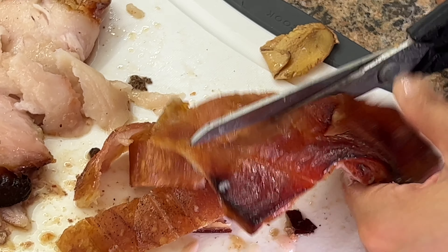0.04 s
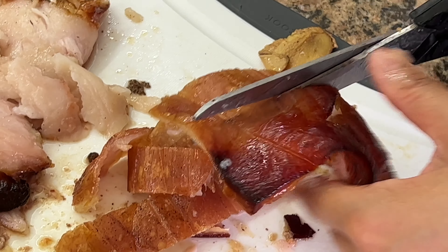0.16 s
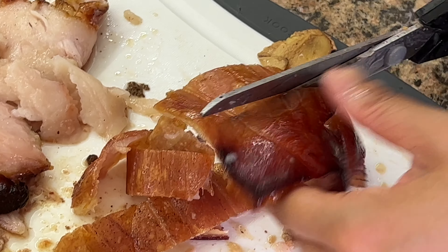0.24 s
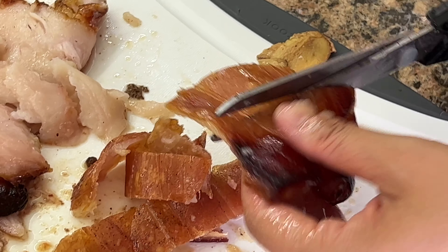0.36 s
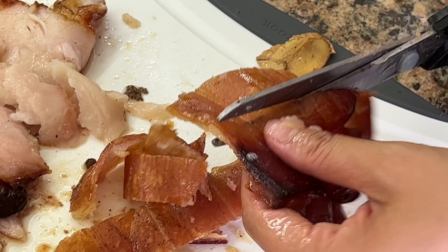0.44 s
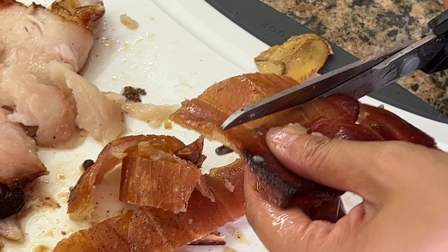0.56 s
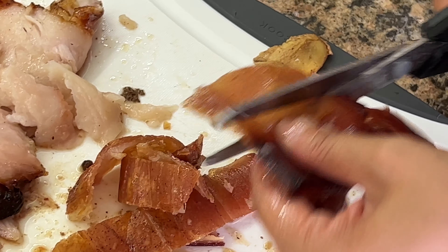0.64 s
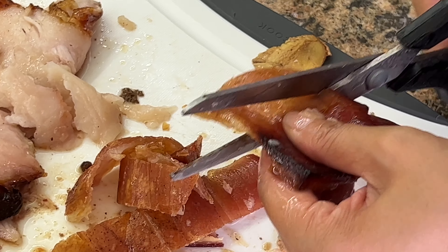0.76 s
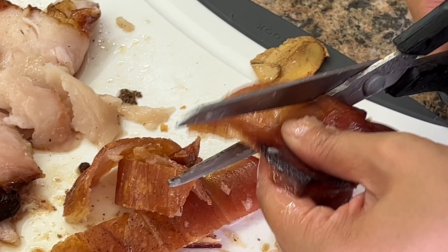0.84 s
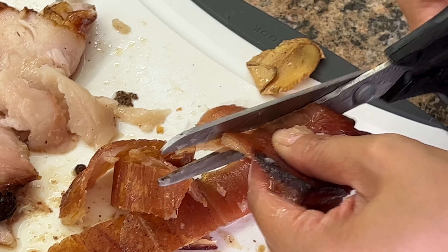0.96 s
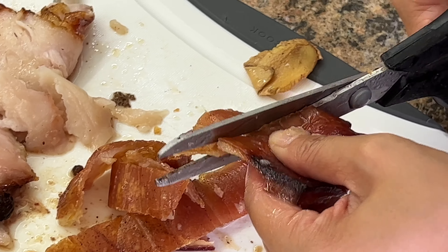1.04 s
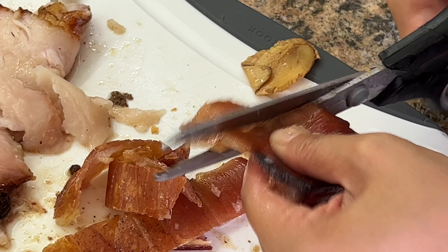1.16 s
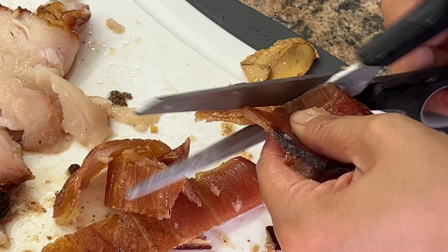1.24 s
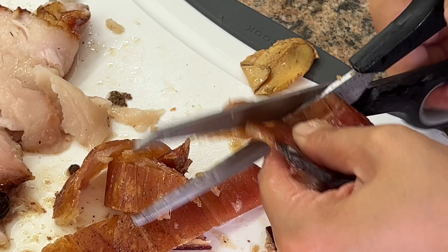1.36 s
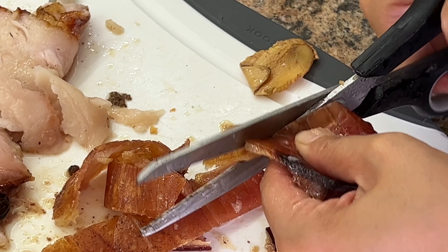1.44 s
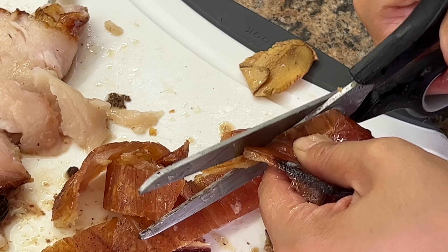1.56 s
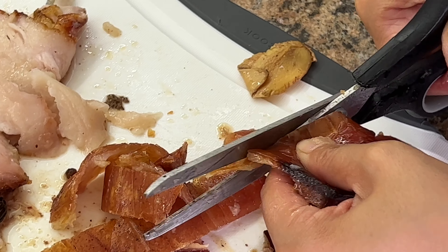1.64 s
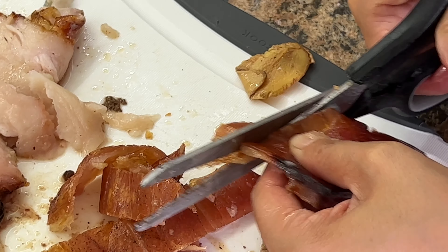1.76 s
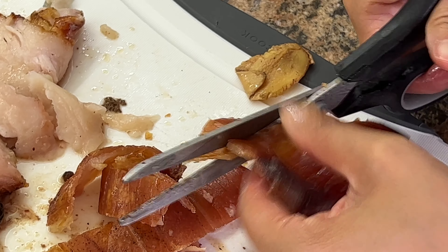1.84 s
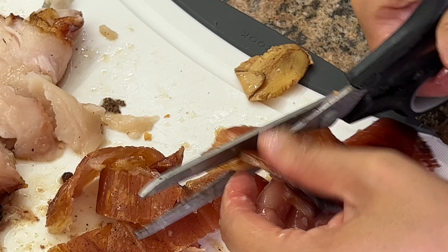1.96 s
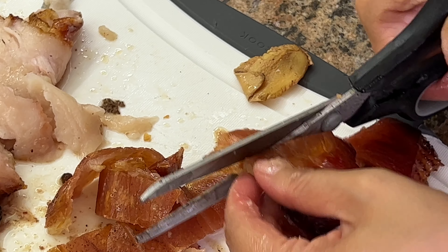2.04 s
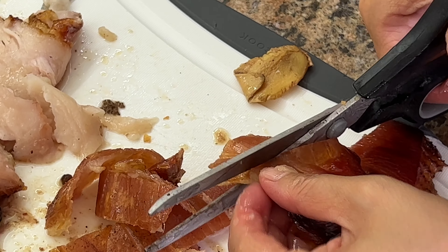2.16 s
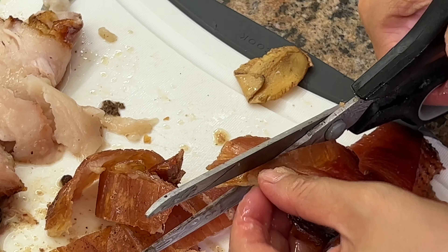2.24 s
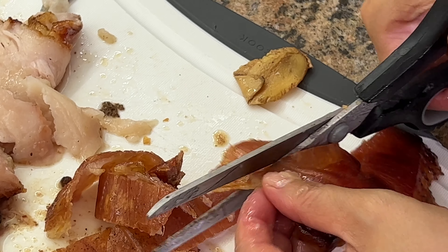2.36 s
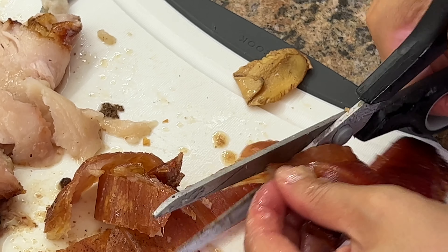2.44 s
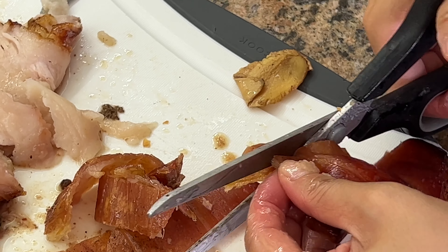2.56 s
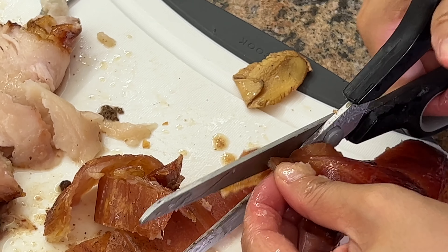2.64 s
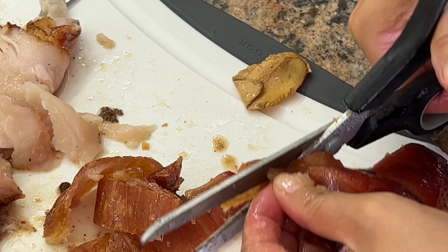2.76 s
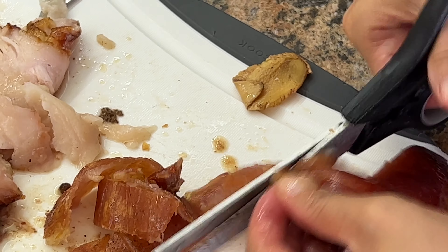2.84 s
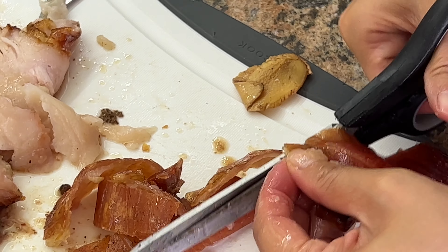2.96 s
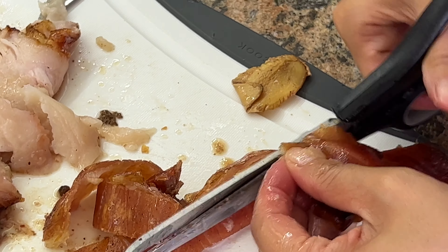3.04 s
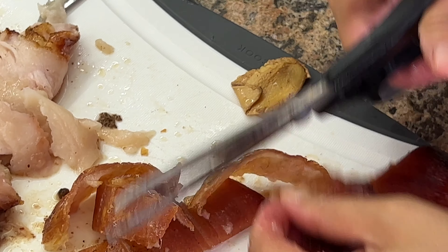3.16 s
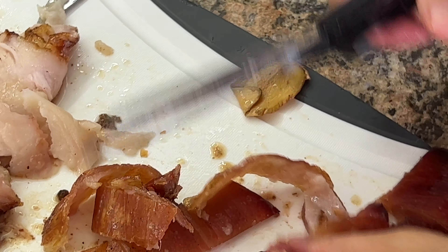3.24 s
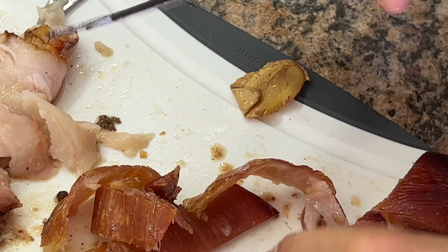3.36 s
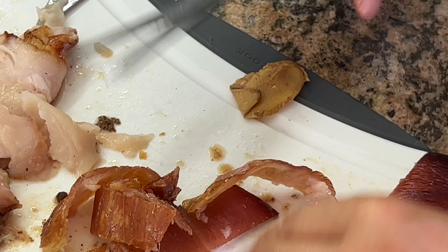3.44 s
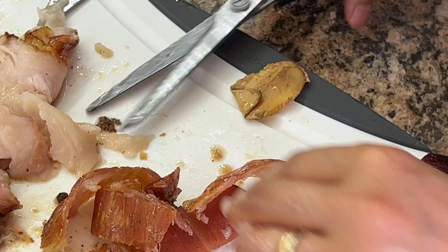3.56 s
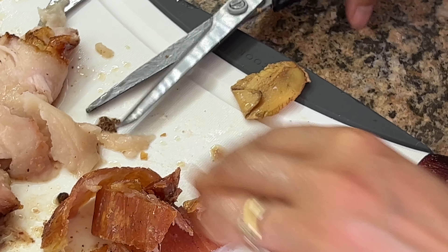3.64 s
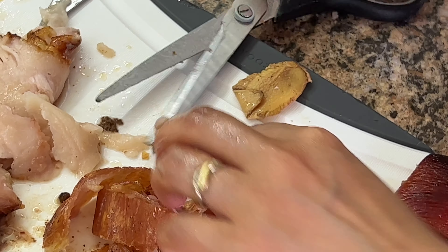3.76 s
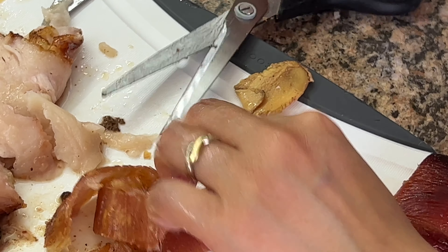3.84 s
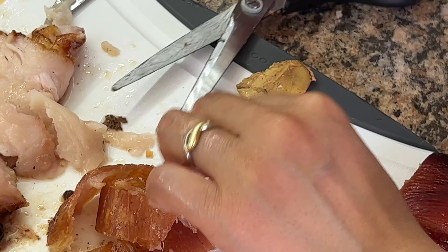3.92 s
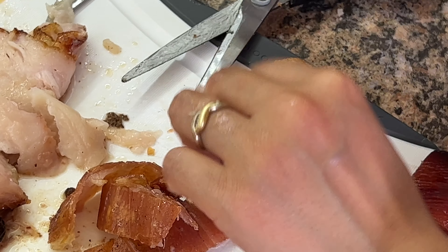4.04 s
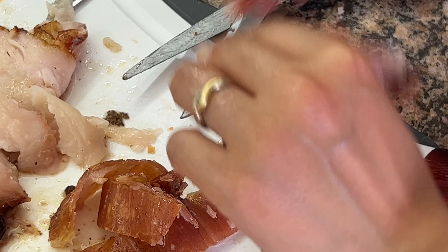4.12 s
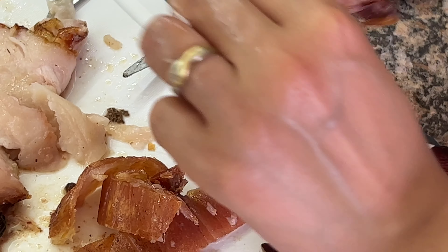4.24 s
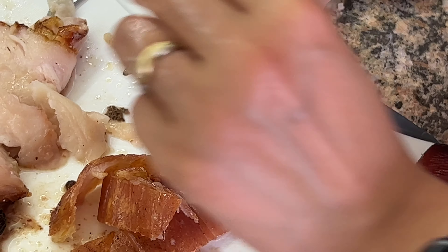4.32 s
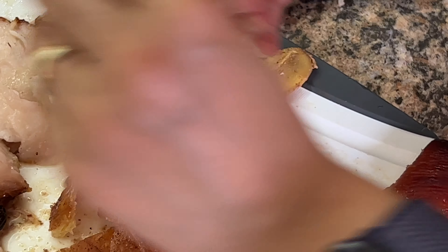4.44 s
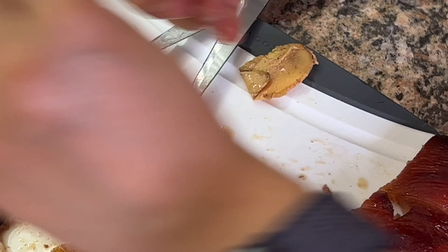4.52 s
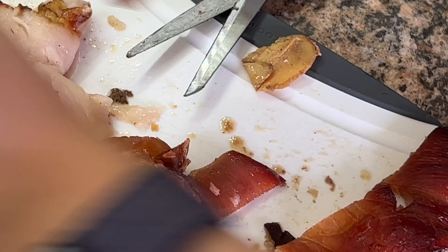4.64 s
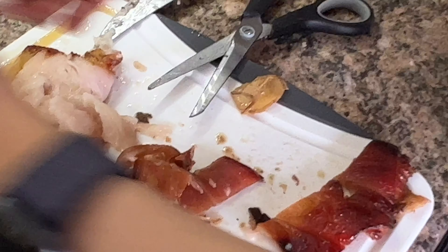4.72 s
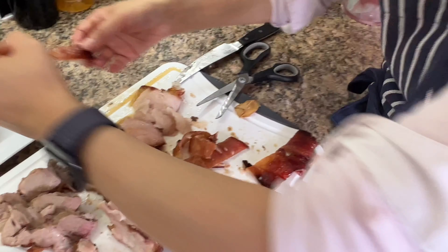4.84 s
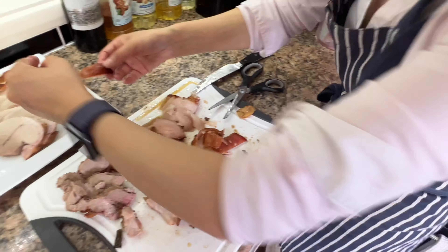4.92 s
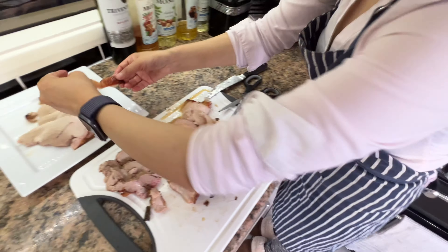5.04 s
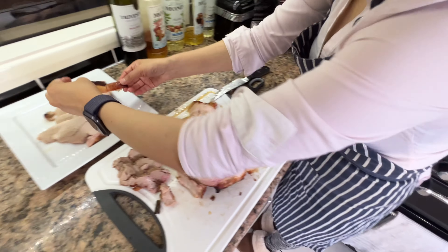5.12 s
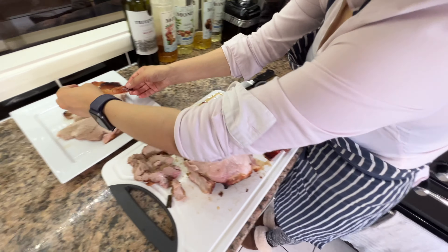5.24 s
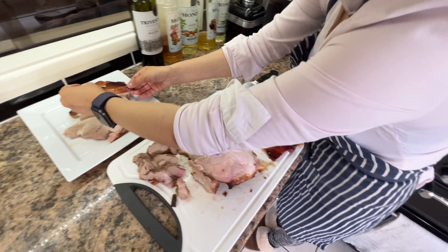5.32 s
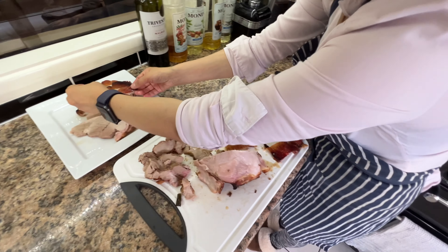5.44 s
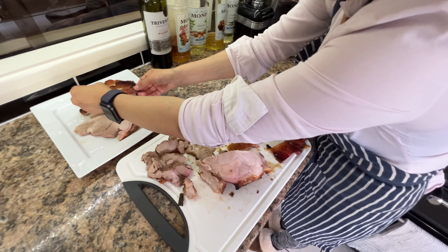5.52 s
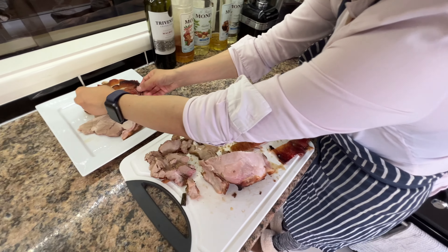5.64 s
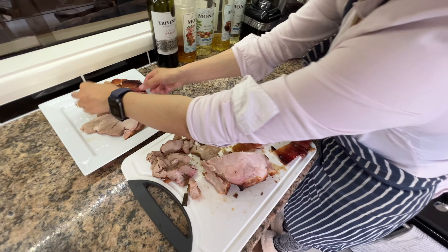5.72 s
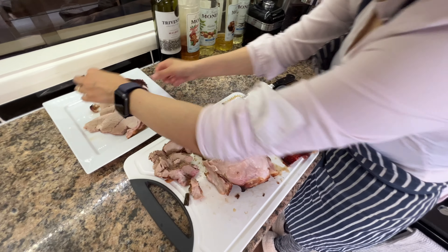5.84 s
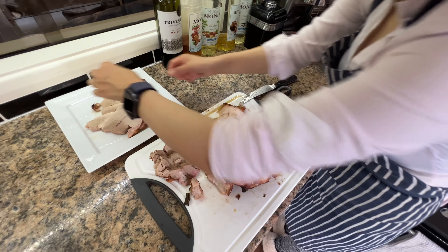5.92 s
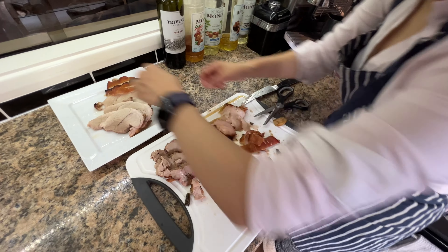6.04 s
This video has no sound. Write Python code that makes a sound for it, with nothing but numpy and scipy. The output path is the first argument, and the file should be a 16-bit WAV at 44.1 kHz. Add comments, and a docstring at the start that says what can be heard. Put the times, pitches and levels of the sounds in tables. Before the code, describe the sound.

Kitchen scissors snip crisp roast pork skin with sharp crunches and faint greasy rubbing, then clatter onto a plastic cutting board.

```python
"""Scissors cutting crisp pork skin

Kitchen scissors cut roast skin over a plastic board, close to a phone. Each fracture is a noise
burst that rings the blades, amid greasy rubbing and soft squelches. The scissors clatter onto the
board and pieces go on a plate. Near the end the hiss rises and the stereo image widens.
An appliance hums in the small, hard room."""
import sys
import numpy as np
from scipy import signal
from scipy.fft import rfft, irfft
from scipy.io import wavfile
from scipy.ndimage import uniform_filter1d

SR = 44100
rng = np.random.default_rng(int(sys.argv[2]) if len(sys.argv) > 2 else 0)


def file_out(sig):
    """Save sig as 16-bit WAV at sys.argv[1]."""
    # one column per channel
    cols = np.atleast_2d(sig).T
    # limit, then scale
    lim = np.clip(cols, -1, 1)
    pcm = np.round(lim * 32767).astype(np.int16)
    wavfile.write(sys.argv[1], SR, pcm)


N = 268105
BURST_N = 8192
BURST_HZ, BURST_S = np.fft.rfftfreq(BURST_N, 1 / SR), np.arange(BURST_N) / SR
SCENE_HZ, SCENE_S = np.fft.rfftfreq(N, 1 / SR), np.arange(N) / SR

# room noise spectrum: f/Hz, level/dB
AIR_SPECTRUM = [(18, -43.5), (32, -20.5), (45, -2), (66, -1), (160, -8), (277, -11), (500, -16.5),
                (950, -20.5), (2000, -43.5), (5000, -44), (16000, -61)]
# hiss spectrum: f/Hz, level/dB
HISS_SPECTRUM = [(200, -7.5), (600, 10.5), (1500, 2.5), (4000, -9), (8000, -7), (11000, -14.5),
                 (16000, -21)]
# appliance hum bands: f/Hz, level/dB, Gaussian width/Hz
HUM_BANDS = [(56, -60.5, 6.6), (109.73, -62, 2.9), (264, -66.5, 30), (463, -74, 8.7)]

# blades and fingers sliding on skin: t/s, length/s, level/dB
SLIDES = [(0, 0.19, -74.5), (0.595, 0.056, -66.5), (1.146, 0.057, -60), (2.373, 0.18, -68),
          (2.625, .17, -70.5), (3.281, 0.036, -64.5), (4.04, 0.25, -76), (4.348, 0.17, -69.5),
          (4.558, 0.28, -68), (5.85, 0.078, -73)]
# rubbing spectrum: f/Hz, level/dB
RUB_SPECTRUM = [(300, -19), (1000, 3.5), (2200, 7.5), (4000, 3.5), (5800, -0.5), (8000, -9.5), (16000, -16)]
# soft narrow-band chirps and squelches: t/s, level/dB, decay/ms, f/Hz, half-width/oct
SQUELCHES = [(0.037, -35.5, 10, 5560, 0.29), (0.136, -39, 35, 3600, .35), (0.402, -37.5, 13, 3130, 0.21),
             (0.61, -26.5, 3.1, 1940, 1), (0.622, -26.5, 11, 1680, .3), (0.689, -44.5, 31, 2900, 0.099),
             (1.625, -42, 25, 4940, 0.1), (1.739, -38, 18, 7200, 0.27), (1.993, -36, 28, 5200, 0.43),
             (2.285, -38, 30, 5180, 0.22), (3.174, -38.5, 12, 5460, 0.3), (3.195, -38, 38, 2917, .2),
             (4.16, -39, 35, 2910, 0.12), (4.738, -34, 17, 2220, 0.26), (5.053, -35.5, 5.3, 5740, 0.3),
             (5.282, -34.5, 6, 3330, 0.18), (5.494, -45, 4.2, 6000, 0.22), (5.652, -37, 25, 1625, .15),
             (5.961, -38.5, 3.7, 5000, .4), (5.992, -35.5, 9, 5900, 0.32)]

# skin fracture spectrum: f/Hz, level/dB
SKIN_SPECTRUM = [(100, -27.5), (600, -19.5), (1000, -17.5), (1400, -7.5), (2050, -3.5), (2700, -8.5),
                 (4500, -4), (7600, 4), (9200, -2.5), (10500, -5.5), (12300, -3.5), (14000, -7),
                 (15800, -12.5)]
# free ring of the blades: f/Hz, level/dB, T60/s
STEEL_MODES = [(2060, -3, .13), (5577, -8, .17), (6100, -5, .2), (6455, 2, .3), (7270, 4, .2),
               (8100, -2, .15)]
# single cracks: t/s, level/dB, decay/ms, body/dB, fizz/dB, blade/dB
CRACKS = [(0.0857, -33.5, 1.6, -21, 0.5, -19), (0.8327, -22.5, 0.4, -1, 4, 3),
          (0.8498, -12.5, 0.99, -4.5, 3.5, -4), (0.869, -11.5, 1.2, 0.5, 2, 1),
          (0.888, -7, 0.72, 4.5, 4, 6), (1.2148, -25, 1, 12, 6, 6), (1.3314, -24.5, 0.7, 1, 3, -2),
          (1.3968, -21.5, 8.2, 1, 2.5, -5), (1.811, -34.5, 4.4, 22, 5, 9), (2.431, -31.5, 3, 25.5, -21, 6),
          (2.53, -32, 1.7, 16, -16, 3), (2.6626, -16, 0.62, -2, -6, 12.5)]
# severing snaps: first crack t/s, level/dB; break t/s, level/dB; decay/ms, body/dB, fizz/dB, blade/dB
SNAPS = [(0.944, -2.5, 0.9471, 2.5, 1.9, 4, 1, -3.5), (2.8062, 2, 2.8116, 8.5, 0.95, -6.5, 1.5, 4.5)]
# crumbs of crust giving way: t/s, level/dB, body/dB
CRUMBS = [(0.626, -30, 16), (0.639, -29.5, 19.5), (0.650, -32.5, 13), (1.45, -32, -10), (2.0345, -47, 1.5),
          (2.056, -37.5, 5), (2.1019, -35, 2), (2.1707, -43.5, 8), (2.444, -30, 28), (2.787, -29, -2.5)]

# board response: f/Hz, level/dB
BOARD_SPECTRUM = [(32, -58), (58, -12), (80, 1.5), (98, -3.5), (120, 5), (140, -7), (162, 2), (230, -11),
                  (340, -4.5), (600, -5.5), (2000, -9.5)]
# soft bumps, a hand then both handles: t/s, level/dB, decay/ms, cutoff/Hz
BUMPS = [(1.220, -7, 8.2, 237.6), (3.853, -5, 12, 599), (3.862, 0, 15, 240)]
# bare contact spectrum: f/Hz, level/dB
CONTACT_SPECTRUM = [(80, -3), (250, -11.5), (1400, 4), (4400, 2.5), (9000, -10), (11000, -10),
                    (16000, -19.5)]
# ring of scissors lying on the board: f/Hz, level/dB, T60/s
CLATTER_MODES = [(320.5, -4, 0.19), (864, -4.5, .11), (1100, -8, 0.22), (1630, -5.5, 0.2), (2140, -4, 0.1),
                 (2530, -5, 0.15), (3560, -9, 0.12), (5320, -0.5, 0.077)]
# scissor and board resonances, by landing part: f/Hz, width/Hz, level/dB
TIPS = [(1133, 300, 18.5), (1810, 360, 14.5), (2922, 180, 15.5), (3250, 180, 12.5), (4100, 110, 10.5),
        (5300, 520, 8.5), (8640, 620, 4.5)]
PIVOT = [(374, 74, 17), (905, 150, 15.7), (1800, 250, 15.2), (2120, 120, 16), (2470, 84, 15),
         (3550, 580, 11.6), (5770, 630, 9.9), (8000, 2000, 3)]
HANDLES = [(400, 43, 8.2), (1040, 150, 12.3), (1700, 140, 8.9), (2150, 140, 14.3), (2580, 450, 10.2),
           (5450, 120, 9.9), (6060, 540, 9.2), (7360, 1800, 4)]
# hard knocks on the board: t/s, part, level/dB, decay/ms, treble/dB, ring/dB, push/dB
LANDINGS = [(3.5190, TIPS, 0.5, 1.15, 3, -20, -9.5), (3.5512, TIPS, -6, 1.7, 0.5, -18, -14),
            (3.6794, HANDLES, -25, 2.5, 13, -13, -10.5), (3.7457, PIVOT, 3, 3.6, 0.5, -13, -13),
            (3.8256, HANDLES, 2.5, 4.2, 2, -13.5, -10.5), (3.8670, HANDLES, -4, 12, -12.5, -10.5, -16),
            (3.911, HANDLES, -20.5, 4.5, -16, -18, -16)]
# smacks of pieces pressed on the plate: t/s, level/dB, f/Hz, half-width/oct
PLACINGS = [(5.221, -32, 3900, 0.51), (5.729, -27.5, 3340, 0.27)]

# room decay: f/Hz, T60/s
ROOM_T60_S = [(100, 0.34), (500, 0.46), (2000, 0.38), (6500, 0.35), (10000, 0.2), (16000, 0.25)]
# diffuse sound at the two microphone ports: f/Hz, coherence
COHERENCE = [(50, 0.92), (150, 1), (350, 0.48), (700, .4), (3000, 1)]
# port imbalance: f/Hz, left minus right/dB
BALANCE_DB = [(30, 1.5), (150, 2.5), (300, 0.3), (1200, 2.5), (2500, 0.54)]
# side signal of close reflections: f/Hz, level/dB
NEAR_SIDE_DB = [(100, -16.5), (600, -6), (1300, -7), (2400, -16), (8000, -19)]
# side signal of the widened image: f/Hz, level re mid/dB
WIDE_SIDE_DB = [(100, -32), (300, -3.5), (600, 1), (8000, -1), (13000, -2)]


def amp(db):
    """Decibels to gain."""
    return 10 ** (np.asarray(db) / 20)


def unit_energy(x):
    """Scale to energy 1."""
    return x / np.sqrt(np.sum(x ** 2) + 1e-20)


def unit_rms(x):
    """Scale to rms 1."""
    return x / np.sqrt(np.mean(x ** 2) + 1e-20)


def lookup(table, hz):
    """Interpolate over log frequency."""
    table_hz, value = np.transpose(table)
    return np.interp(np.log(hz + 1), np.log(table_hz + 1), value)


def add(mix, start_s, sound):
    """Mix in at start_s."""
    part = mix[max(round(start_s * SR), 0):][:len(sound)]
    part += sound[:len(part)]


def shaped(x, spectrum):
    """Filter a scene-length signal by a dB table."""
    return irfft(rfft(x) * amp(lookup(spectrum, SCENE_HZ)), N)


def diffuse(length):
    """Stereo noise, partly coherent as at two nearby ports."""
    coherence = np.clip(lookup(COHERENCE, np.fft.rfftfreq(length, 1 / SR)), 0, 1)
    noise = rfft(rng.standard_normal((2, length)))
    mid, side = noise * np.sqrt([(1 + coherence) / 2, (1 - coherence) / 2])
    return irfft(np.array([mid + side, mid - side]), length)


def fade(tau_ms):
    """Exponential decay."""
    return np.exp(-BURST_S * 1000 / max(tau_ms, 0.05))


def burst(envelope, colour_db, smooth_bins):
    """Enveloped noise, flattened, then coloured at minimum phase."""
    spectrum = rfft(rng.standard_normal(BURST_N) * envelope)
    magnitude = np.sqrt(uniform_filter1d(abs(spectrum) ** 2, smooth_bins) + 1e-12)
    log_gain = np.log(amp(np.maximum(colour_db, -80)) / magnitude)
    mirrored = np.r_[log_gain, log_gain[-2:0:-1]]
    log_causal = np.conj(signal.hilbert(mirrored))[:len(BURST_HZ)]
    return unit_energy(irfft(spectrum * np.exp(log_causal), BURST_N))


def ring(modes, spot_db=1.5):
    """Decaying modes; levels vary with the spot struck."""
    t = np.arange(SR // 2) / SR
    sound = np.zeros(len(t))
    for hz, db, t60_s in modes:
        gain = amp(db + spot_db * rng.standard_normal())
        sound += gain * amp(-60 * t / t60_s) * np.sin(2 * np.pi * (hz * t + rng.random()))
    return unit_energy(sound)


def room_air(db=-58):
    """Low, diffuse room noise."""
    return amp(db) * unit_rms(shaped(diffuse(N), AIR_SPECTRUM))


def hiss(early_db=-89.5, late_db=-69.5, rise_at_s=4.42, ramp_s=0.32):
    """Fine hiss; rises near the end."""
    rise = np.clip((SCENE_S - rise_at_s) / ramp_s, 0, 1)
    return unit_rms(shaped(diffuse(N), HISS_SPECTRUM)) * amp(early_db + (late_db - early_db) * rise)


def appliance_hum():
    """Wavering hum from narrow noise bands."""
    out = np.zeros(N)
    for hz, db, width_hz in HUM_BANDS:
        band = np.exp(-0.5 * ((SCENE_HZ - hz) / width_hz) ** 2)
        out += amp(db) * unit_rms(irfft(rfft(rng.standard_normal(N)) * band, N))
    return out


def slide_envelope(attack_s=0.023, release_s=0.02, holding_db=-80):
    """Slides rise, hold and die; between them the fingers only shift their hold."""
    power = amp(holding_db) ** 2
    for start_s, length_s, db in SLIDES:
        age_s = SCENE_S - start_s
        stroke = np.clip(age_s / attack_s, 0, 1) * np.exp(-np.maximum(age_s - length_s, 0) / release_s)
        power = power + (amp(db) * stroke) ** 2
    return np.sqrt(power)


def rubbing(grains_per_s=450, spread_db=1.0, smooth_gain=0.77, pocket_db=2.0):
    """Crust crumbles over a greasy slide; wet pockets add brief, shifting resonances."""
    sizes = amp(spread_db * np.minimum(rng.exponential(1, N), 4))
    grains = unit_rms(sizes * rng.standard_normal(N) * (rng.random(N) < grains_per_s / SR))
    frames = signal.stft(grains + smooth_gain * rng.standard_normal(N), nperseg=256)[2]
    patch = np.outer(np.hanning(11), np.hanning(35))  # bins by frames
    pockets = unit_rms(signal.fftconvolve(rng.standard_normal(frames.shape), patch, "same"))
    slide = signal.istft(frames * amp(pocket_db * np.minimum(pockets, 2)), nperseg=256)[1][:N]
    return unit_rms(shaped(slide, RUB_SPECTRUM)) * slide_envelope()


def squish(decay_ms, hz, half_width_oct, rise_ratio=0.29, flutter_db=5):
    """Brief, uneven scuff of noise in one band."""
    band_db = -10 * np.log10(1 + (np.log2((BURST_HZ + 1) / hz) / half_width_oct) ** 8)
    flutter = amp(flutter_db * unit_rms(uniform_filter1d(rng.standard_normal(BURST_N), size=130)))
    return burst(flutter * fade(decay_ms) * (1 - fade(rise_ratio * decay_ms)), band_db, smooth_bins=40)


def squelches(faint_count=48, faint_per_s=8, faint_db=-45.5, faint_hz=3400, range_oct=0.85):
    """Short, soft narrow-band chirps and squelches: some clear, others faint and random."""
    out = np.zeros(N)
    for start_s, db, *shape in SQUELCHES:
        add(out, start_s, amp(db) * squish(*shape))
    for k, (jitter, pitch) in enumerate(rng.random((faint_count, 2))):
        hz = faint_hz * 2 ** (range_oct * (2 * pitch - 1))
        faint = squish(decay_ms=28, hz=hz, half_width_oct=0.16)
        add(out, (k + jitter) / faint_per_s, amp(faint_db) * faint)
    return out


def fracture(db, decay_ms, body_db, fizz_db, blade_db, scatter_db=-20, scatter_ms=10, rise_ms=0.38):
    """Tight burst, scattered by hand and board; jolts the blades into ringing."""
    body = lookup([(3000, 1.0), (6000, 0.018)], BURST_HZ)  # thick pieces
    fizz = lookup([(8000, 0.018), (11500, 1.0)], BURST_HZ)  # thin flakes
    blade_hz, half_width_hz = 6320, 430  # strongest resonance, damped by the grip
    blade = 1 / (1 + ((BURST_HZ - blade_hz) / half_width_hz) ** 2)
    colour_db = lookup(SKIN_SPECTRUM, BURST_HZ) + body_db * body + fizz_db * fizz + blade_db * blade
    envelope = (fade(decay_ms) + amp(scatter_db) * fade(scatter_ms)) * (1 - fade(rise_ms))
    sound = amp(-25 + 0.8 * blade_db) * ring(STEEL_MODES)
    add(sound, 0, burst(envelope, colour_db, smooth_bins=200))
    return amp(db) * sound


def cutting(splinters=2, gap_s=0.0029, step_db=-8.5, splinter_body_db=4):
    """Single cracks and two snaps; a snap is first crack, break, dying splinters."""
    out = np.zeros(N)
    for start_s, *crack in CRACKS:
        add(out, start_s, fracture(*crack))
    for first_s, first_db, break_s, db, decay_ms, body_db, fizz_db, blade_db in SNAPS:
        # blades still grip: less fizz, more steel
        add(out, first_s, fracture(first_db, decay_ms, body_db, fizz_db - 3.5, blade_db + 6.5))
        add(out, break_s, fracture(db, decay_ms, body_db, fizz_db, blade_db))
        for k in range(1, splinters + 1):
            splinter = fracture(db + k * step_db, decay_ms, splinter_body_db, fizz_db, blade_db)
            add(out, break_s + k * gap_s, splinter)
    return out


def crackle():
    """Crumbs of crust give way under blade pressure."""
    out = np.zeros(N)
    for start_s, db, body_db in CRUMBS:
        add(out, start_s, fracture(db, decay_ms=6.5, body_db=body_db, fizz_db=-5, blade_db=4))
    return out


def reopening(open_s=1.215, ring_hz=5394, ring_db=-74, t60_s=0.65, scrape_s=1.39, scrape_db=-31.5):
    """Blades spring apart, one rings freely, then the edges scrape together."""
    out, t = np.zeros(N), np.arange(SR // 2) / SR
    add(out, open_s, amp(ring_db - 60 * t / t60_s) * np.sin(2 * np.pi * ring_hz * t))
    add(out, scrape_s, amp(scrape_db) * squish(decay_ms=100, hz=7800, half_width_oct=0.21))
    return out


def board_push(decay_ms, cutoff_hz):
    """A soft push excites only the board's low resonances."""
    softness_db = -10 * np.log10(1 + (BURST_HZ / cutoff_hz) ** 6)
    return burst(fade(decay_ms), lookup(BOARD_SPECTRUM, BURST_HZ) + softness_db, smooth_bins=7)


def thuds(lag_s=0.00508, db_per_oct=31, contacts=3, rebound_s=0.02, rebound_db=-7):
    """The board gives after each knock, and under soft bumps that rebound."""
    out = np.zeros(N)
    for start_s, _, db, *_, push_db in LANDINGS:
        cutoff_hz = 385 * 2 ** (db / db_per_oct)  # harder knocks reach higher
        add(out, start_s + lag_s, amp(push_db) * board_push(decay_ms=20, cutoff_hz=cutoff_hz))
    for start_s, db, decay_ms, cutoff_hz in BUMPS:
        for k in range(contacts):
            add(out, start_s + k * rebound_s, amp(db + k * rebound_db) * board_push(decay_ms, cutoff_hz))
    return out


def knocks(scatter_db=-18, scatter_ms=10, rise_ms=0.56):
    """Tips, pivot and handles hit the board, each with its own short resonances."""
    out = np.zeros(N)
    treble = lookup([(3500, 0), (7000, 1)], BURST_HZ)
    for start_s, part, db, decay_ms, treble_db, ring_db, _ in LANDINGS:
        power = amp(lookup(CONTACT_SPECTRUM, BURST_HZ)) ** 2
        for hz, width_hz, mode_db in part:
            power += (amp(mode_db) / (1 + 2 * ((BURST_HZ - hz) / width_hz) ** 2)) ** 2
        colour_db = 10 * np.log10(power) + treble_db * treble
        contact = (fade(decay_ms) + amp(scatter_db) * fade(scatter_ms)) * (1 - fade(rise_ms))
        add(out, start_s, amp(db) * burst(contact, colour_db, smooth_bins=40))
        add(out, start_s, amp(db + ring_db) * ring(CLATTER_MODES))
    return out


def plate(drop_s=4.851, flop_lag_s=0.027, squash_lag_s=0.012):
    """Meat drops with a click and a thump, flops to rest; pressed pieces smack, then squash."""
    out = np.zeros(N)
    add(out, drop_s, amp(-35) * squish(decay_ms=2, hz=1350, half_width_oct=1.3))
    add(out, drop_s, amp(-12) * squish(decay_ms=3.8, hz=360, half_width_oct=0.74))
    add(out, drop_s + flop_lag_s, amp(-20) * squish(decay_ms=6.5, hz=360, half_width_oct=0.74))
    for start_s, db, hz, half_width_oct in PLACINGS:
        smack = squish(decay_ms=4.7, hz=hz, half_width_oct=half_width_oct)
        squash = squish(decay_ms=9.8, hz=1320, half_width_oct=0.3)
        add(out, start_s, amp(db) * smack)
        add(out, start_s + squash_lag_s, amp(db - 3.5) * squash)
    return out


def kitchen_reverb(x, build_ms=9):
    """Dense reflections from counter and walls; treble dies first."""
    hz, t, frames = signal.stft(diffuse(SR * 3 // 4), SR, nperseg=256)
    decay = amp(-60 * t / lookup(ROOM_T60_S, hz)[:, None])
    tail = signal.istft(frames * decay, SR, nperseg=256)[1]
    tail[:, :BURST_N] *= 1 - fade(build_ms)
    return signal.fftconvolve(x[None], np.sqrt(2) * unit_energy(tail), axes=1)[:, :N]


def near_reflections(x, rise_ms=1.7, decay_ms=3.7):
    """Board and hands reflect within a few ms, unequally left and right."""
    echoes = burst(fade(decay_ms) * (1 - fade(rise_ms)) ** 4, colour_db=0, smooth_bins=200)
    side = shaped(signal.fftconvolve(x, echoes)[:N], NEAR_SIDE_DB)
    return np.array([x + side, x - side])


def ports(pair, split_hz=8400, delay_s=0.00028):
    """The two ports differ in level, and in phase above split_hz."""
    lean_db = lookup(BALANCE_DB, SCENE_HZ) / 2
    phase = -2 * np.pi * delay_s * np.maximum(SCENE_HZ - split_hz, 0)
    return irfft(rfft(pair) * np.array([amp(lean_db) * np.exp(1j * phase), amp(-lean_db)]), N)


def widened(pair, start_s=4.86, ramp_s=0.059, rise_ms=0.25, decay_ms=3.1):
    """Near the end the stereo image widens: smeared mid is added as side."""
    smear = burst(fade(decay_ms) * (1 - fade(rise_ms)) ** 4, colour_db=0, smooth_bins=40)
    opening = np.clip((SCENE_S - start_s) / ramp_s, 0, 1)
    side = opening * shaped(signal.fftconvolve(pair.mean(0), smear)[:N], WIDE_SIDE_DB)
    return pair + np.array([side, -side])


def scene():
    """Snaps and knocks nearly dry; soft sounds carry more room."""
    cuts, knock, thud = cutting() + crackle() + reopening(), knocks(), thuds()
    soft = squelches() + plate() + rubbing()
    room = kitchen_reverb(amp(-14.5) * cuts + amp(-11.5) * knock + amp(-8.5) * thud + amp(-5) * soft)
    air, fine_hiss, hum = room_air(), hiss(), appliance_hum()
    impacts = near_reflections(cuts + knock + thud)
    return widened(ports(impacts + soft + room + air + hum) + fine_hiss)


def record(dry):
    """Low-pass at 16.4 kHz."""
    lowpass = signal.firwin(255, 16400, window=("kaiser", 8), fs=SR)
    return signal.oaconvolve(dry, lowpass[None], "same")


dry = scene()
out = record(dry)
file_out(out)
```